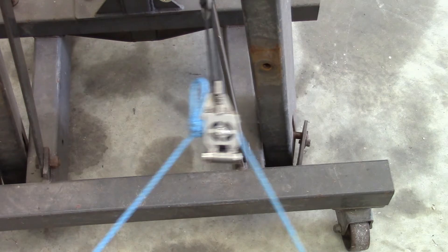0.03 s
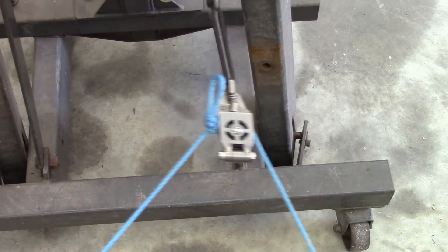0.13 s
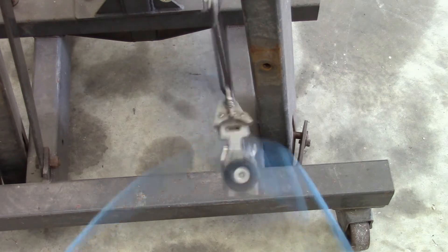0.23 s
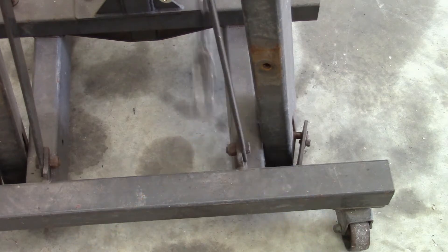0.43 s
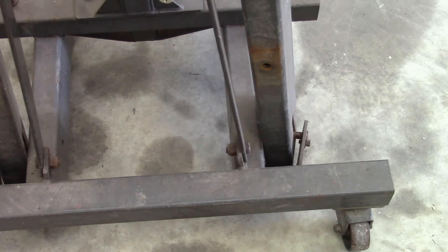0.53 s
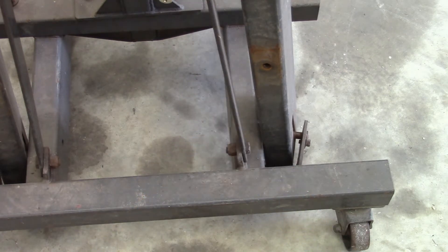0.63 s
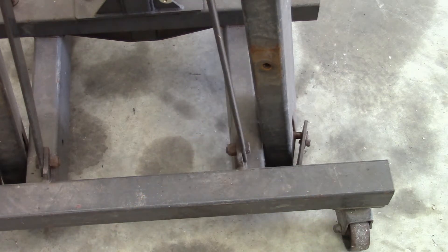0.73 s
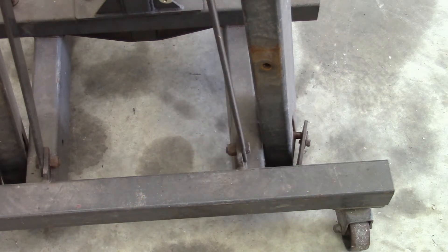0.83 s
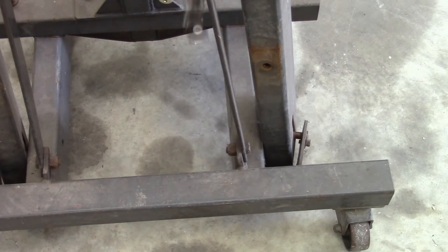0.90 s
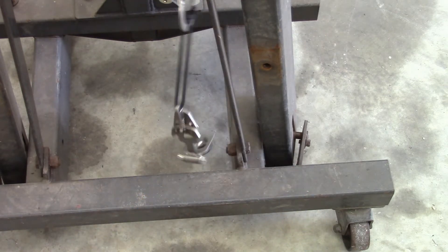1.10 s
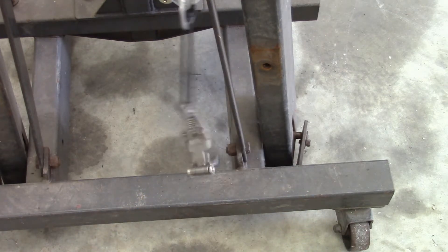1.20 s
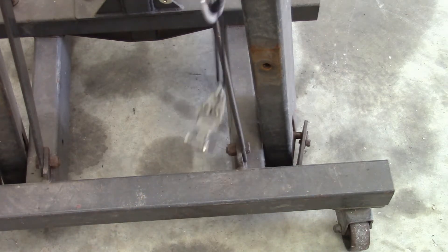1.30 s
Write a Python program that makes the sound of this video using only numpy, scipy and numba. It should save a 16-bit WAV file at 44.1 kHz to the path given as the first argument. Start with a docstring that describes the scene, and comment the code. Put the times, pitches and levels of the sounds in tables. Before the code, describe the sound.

A metal pulley lets go with a sharp click, then clanks and rattles against a steel frame, which rings briefly. The hits are close, echoing in a hard workshop over a machine's hum and low rumble.

```python
"""A metal pulley on a stretched cord is let go with a sharp click, flies up, clanks against a steel
frame and rattles back down. The cord hisses briefly as it slips; the pulley's loose parts crack and ring.
The frame rings with a few strong modes over many weak ones. A hard workshop room echoes the metal
over a machine's hum and low rumble. A limiter ducks under the loudest hits."""
import sys
import numpy as np
from scipy import signal
from scipy.fft import rfft, irfft
from scipy.io import wavfile
from scipy.ndimage import uniform_filter1d, minimum_filter1d
from numba import njit

SR = 44100
rng = np.random.default_rng(int(sys.argv[2]) if len(sys.argv) > 2 else 0)


def store_pcm(level_fs):
    """Save levels as 16-bit WAV."""
    pcm = np.round(np.clip(level_fs, -1, 1) * 32767).astype(np.int16)
    wavfile.write(sys.argv[1], SR, np.atleast_2d(pcm).T)


N = 59535

# machine hum partials: pitch_hz, rms_db
HUM_PARTIALS = [(125, -51.5), (188, -38.5), (310, -46.5), (436, -64.5), (815, -46.5)]
# rumble spectrum: freq_hz, density_db
RUMBLE_SPECTRUM = [(25, -41), (45, -25), (70, -16), (95, -12.5), (135, -2.5), (250, 1), (550, -3),
                   (850, -5.5), (1100, -12), (2400, -23), (5000, -34.5), (10000, -41.5), (15000, -58)]
# rumble, side against mid: freq_hz, gain_db
RUMBLE_SIDE_GAIN = [(25, -5), (60, -14), (125, -21.5), (300, -24.5), (1000, -19.5), (5000, -7.5)]
# noise of the slip and the clicks: freq_hz, density_db
CRACK_SPECTRUM = [(100, -76), (1000, -35), (3000, -10.5), (5000, -5), (7500, -1.5), (9500, 0), (11000, -2),
                  (13600, -3), (14400, -7), (16000, -8.5)]
# clicks of the pulley's parts: start_s, level_db, tilt_db_per_oct, rise_s
PULLEY_CLICKS = [(.2245, -17.5, -6, 0.00061), (.2303, -2, -2.5, 0.00051), (.2330, -0.5, 2.5, 0.00057),
                 (.302, -19, 4, .003), (.385, -32.5, -7, 0.0011), (.430, -11.5, -14, 0.0027),
                 (.485, -21, -7, 0.0032), (.5128, -10.5, -4, 0.00021), (.528, -10, 2, 0.0016),
                 (.720, -23.5, -14, 0.0021), (.8495, -26, -4, .001), (.893, -20, -4, 0.0035),
                 (.933, -9, 1, 0.0017), (.9805, 6, 5, .0004), (.9824, 5, 1, 0.00035),
                 (.9858, -6, 3, 0.00059), (1.10, -24, -4, 0.0035), (1.201, -18.5, -22, 0.0027)]
# pulley modes: pitch_hz, level_db, t60_s
PULLEY_MODES = [(1980, -19, .03), (4030, -10, .035), (6580, -6, .03), (7305, -5, .035), (7770, -4, .04),
                (7955, -1, .04), (8750, -7, .03), (10670, -4, .03), (10990, -3, .035), (11900, -6, .03),
                (13025, -4, .03), (13520, -1, .035)]
# blows on the frame: start_s, level_db, tilt_db_per_oct, rise_s, strong_db, spot_hz, spot_db
FRAME_BLOWS = [(0.257, -15.5, -10, 0.03, -7.5, 1798, 11.5), (.384, -31, -5, 0.001, -3, 2140, 12),
               (.426, -15, -1.5, 0.0046, 2, 1076, 13.5), (.513, -3.5, .5, 0.0015, -2, 3820, 8),
               (0.537, -12, 3.5, 0.0014, 2.5, 2460, 15.5), (.560, -16, -4.5, 0.0013, 0.5, 868, 15.5),
               (.719, -28, -1.5, 0.0018, -1, 4800, 14), (0.848, -10.5, -1, .003, 0, 3870, 7.5),
               (.925, -11, 3.5, 0.0027, -22, 2280, 16.5), (.931, -6.5, -0.5, 0.001, -6, 3170, 7.5),
               (1.095, -30.5, -4, .004, 5, 3020, -3), (1.165, -27.5, -0.5, 0.015, -2, 1056, -3.5),
               (1.195, -22, -9.5, 0.0098, -4.5, 1840, 7), (1.222, -34.5, -10.5, 0.0052, -1, 2430, 16.5),
               (1.339, -31.5, 2.5, 0.011, -11, 4410, 13)]
# strong frame modes: pitch_hz, level_db, t60_s
STRONG_MODES = [(872, -23, .45), (1056, -11, .42), (1312, -11, .48), (1655, -8, .45), (1798, -12, .42),
                (2088, -5, .3), (2149, -6, .45), (2317, -4, .42), (2360, -4, .55), (2628, -6, .35),
                (2800, -8, .35), (2896, -5, .35), (2968, -2, .38), (3520, -4, .25), (3700, -2, .3),
                (3809, -1, .22), (4005, -1, .2), (4119, -2, .2), (4689, -3, .22), (6215, -9, .28),
                (7360, -14, .3), (10800, -13, .2)]
# weak frame modes, level of each: freq_hz, level_db
WEAK_SPECTRUM = [(400, -19), (800, -20), (1250, -4.5), (1500, -5.5), (1700, -3), (2400, 1), (3000, 2),
                 (3900, 2.5), (5100, -1), (8000, -6.5), (8700, -12), (11000, -13), (15500, -32)]
# room decay (negative below about 600 Hz: those bands swell late): freq_hz, t60_s
ROOM_DECAY = [(300, -0.8), (1200, 0.77), (2500, 0.57), (5000, 0.29), (8000, .5), (15000, 0.23)]
# echo against direct sound: freq_hz, gain_db
ROOM_GAIN = [(300, 5.5), (1200, 2.5), (2500, -5.5), (5000, -13), (9000, -15.5), (15000, -22)]
# reflections in the side channel: freq_hz, gain_db
METAL_SIDE_GAIN = [(500, -26), (1200, -32), (2200, -23.5), (4000, -19), (12000, -16)]

TIME_S = np.arange(N) / SR
LN_1000 = np.log(1000)  # 60 dB of decay


def undb(db):
    return 10 ** (np.asarray(db) / 20)


def at_hz(table, hz):
    """Read a (freq_hz, value) table on a log-frequency axis."""
    freq_hz, values = np.array(table, float).T
    return np.interp(np.log(np.maximum(hz, 1)), np.log(freq_hz), values)


def colour(x, table):
    """Filter by a (freq_hz, gain_db) table."""
    return irfft(rfft(x) * undb(at_hz(table, np.fft.rfftfreq(N, 1 / SR))), N)


def noise(spectrum):
    """Coloured noise, rms 1."""
    y = colour(rng.standard_normal(N), spectrum)
    return y / y.std()


def wander(rate_hz):
    """Smooth random curve, standard deviation 1."""
    hold = int(SR / rate_hz)
    steps = np.repeat(rng.standard_normal(N // hold + 1), hold)
    y = uniform_filter1d(uniform_filter1d(steps, hold), hold)[:N]
    return y / y.std()


def add(out, start_s, y):
    i = int(start_s * SR)
    out[i:i + len(y)] += y[:N - i]


def stereo(mid, side):
    return np.array([mid + side, mid - side])


@njit
def sum_phasors(start, poles, samples):
    y, phasors = np.zeros(samples), start.copy()
    for i in range(samples):
        for k in range(len(phasors)):
            phasors[k] *= poles[k]
            y[i] += phasors[k].imag
    return y


def ring(hz, level_db, t60_s, samples):
    """Damped modes struck once, random phases."""
    poles = np.exp((2j * np.pi * hz - LN_1000 / t60_s) / SR)
    start = undb(level_db) * np.exp(2j * np.pi * rng.random(len(hz)))
    return sum_phasors(start, poles, samples)


def machine_hum(waver_db=4.5, drift_rad=0.33):
    """Steady pitches, each wavering in level and phase."""
    out = np.zeros(N)
    for hz, rms_db in HUM_PARTIALS:
        amplitude = np.sqrt(2) * undb(rms_db + waver_db * wander(rate_hz=21.2))
        out += amplitude * np.sin(2 * np.pi * hz * TIME_S + drift_rad * wander(rate_hz=14.17))
    return out


def workshop_rumble(rms_db=-34.5):
    """Low noise, nearly the same in both ears."""
    mid = noise(RUMBLE_SPECTRUM)
    side = colour(noise(RUMBLE_SPECTRUM), RUMBLE_SIDE_GAIN)
    return undb(rms_db) * stereo(mid, side)


def cord_slip(start_s=0.196, length_s=0.026, end_db=-45):
    """The cord slides out with a growing hiss before the release."""
    ramp = (TIME_S - start_s) / length_s
    return noise(CRACK_SPECTRUM) * undb(end_db) * ramp * ((ramp > 0) & (ramp < 1))


def pulley_clicks(crack_gain_db=-5, crack_t60_s=0.017, ring_gain_db=-15.5):
    """Loose parts knock together: a noise crack and a brief ring per click."""
    hz, mode_db, t60_s = np.array(PULLEY_MODES, float).T
    crack_envelope = undb(crack_gain_db) * np.exp(-LN_1000 * TIME_S / crack_t60_s)
    out = np.zeros(N)
    for start_s, level_db, tilt_db_per_oct, rise_s in PULLEY_CLICKS:
        def tilt_db(f):
            return tilt_db_per_oct * np.log2(np.maximum(f, 6000) / 9000)

        click = noise([(f, db + tilt_db(f)) for f, db in CRACK_SPECTRUM]) * crack_envelope
        add(click, 0, ring(hz, mode_db + ring_gain_db + tilt_db(hz), t60_s, samples=3000))
        attack = 1 - np.exp(-TIME_S / rise_s)
        add(out, start_s, click * undb(level_db) * attack)
    return out


def weak_modes(strong_hz, count=480, gain_db=-26.5, cluster_db=5, cluster_width_hz=45,
               typical_t60_s=0.21, t60_spread_oct=0.25):
    """The frame's dense weak modes, louder close to a strong one."""
    position = (np.arange(count) + rng.random(count)) / count
    hz = np.interp(position, [0, 1], np.sqrt([400, 15500])) ** 2
    t60_scatter = 2 ** (t60_spread_oct * rng.standard_normal(count))
    t60_s = typical_t60_s * (hz / 3000) ** 0.0099 * t60_scatter
    apart_hz = np.abs(hz[:, None] - strong_hz).min(1)
    lift_db = cluster_db * np.exp(-(apart_hz / cluster_width_hz) ** 2)
    return hz, at_hz(WEAK_SPECTRUM, hz) + gain_db + lift_db, t60_s


def frame_clanks(strong_gain_db=-13.5, scatter_db=1, spot_width_oct=0.063):
    """Each blow rings the same steel modes; the struck spot favours those near spot_hz."""
    hz, mode_db, t60_s = np.array(STRONG_MODES, float).T
    weak_hz, weak_db, weak_t60_s = weak_modes(hz)
    out = np.zeros(N)
    for start_s, level_db, tilt_db_per_oct, rise_s, strong_db, spot_hz, spot_db in FRAME_BLOWS:
        def strike_db(f, spot_share):
            tilt_db = tilt_db_per_oct * np.log2(f / 3000)
            lift_db = spot_share * spot_db * np.exp(-(np.log2(f / spot_hz) / spot_width_oct) ** 2)
            return level_db + tilt_db + lift_db + scatter_db * rng.standard_normal(len(f))

        struck_db = mode_db + strong_gain_db + strong_db + strike_db(hz, spot_share=1)
        clank = ring(hz, struck_db, t60_s, samples=24000)
        struck_weak_db = weak_db + strike_db(weak_hz, spot_share=0.5)
        add(clank, 0, ring(weak_hz, struck_weak_db, weak_t60_s, samples=11000))
        attack = 1 - np.exp(-TIME_S[:len(clank)] / rise_s)
        add(out, start_s, clank * attack)
    return out


def room_echo(x, onset_s=0.011):
    """Diffuse workshop echo; the treble dies before the mids."""
    hz, time_s, bands = signal.stft(rng.standard_normal(N), SR, nperseg=256)
    onset = 1 - np.exp(-(time_s / onset_s) ** 2)
    envelope = onset * np.exp(-LN_1000 * time_s / at_hz(ROOM_DECAY, hz)[:, None])
    gain = undb(at_hz(ROOM_GAIN, hz)) / np.sqrt(N * np.mean(envelope ** 2, axis=1))
    _, impulse_response = signal.istft(bands * envelope * gain[:, None], SR)
    return signal.fftconvolve(x, impulse_response)[:N]


def limiter(x, limit_db=-0.4, lookahead_s=0.0058, release_s=0.011):
    """Gain drops just ahead of each peak over the limit and recovers quickly."""
    window = int(lookahead_s * SR)
    excess_nepers = np.maximum(np.log(np.abs(x).max(0) / undb(limit_db) + 1e-9), 0)
    held_nepers = -minimum_filter1d(-excess_nepers, window)
    decay = TIME_S / release_s
    # peak hold with exponential release
    cut_nepers = np.exp(np.maximum.accumulate(np.log(held_nepers + 1e-9) + decay) - decay)
    return x * np.exp(-uniform_filter1d(cut_nepers, window))


def scene(floor_delay_s=0.0017):
    """Metal close in front; floor reflection and room echo differ between the ears."""
    background = machine_hum() + workshop_rumble()
    metal = frame_clanks() + cord_slip() + pulley_clicks()
    floor_reflection = np.zeros(N)
    add(floor_reflection, floor_delay_s, metal)
    mid = metal + room_echo(metal)
    side = colour(floor_reflection + room_echo(metal), METAL_SIDE_GAIN)
    return background + stereo(mid, side)


def record(dry, cutoff_hz=15700):
    """Peak limiter, then a steep low-pass."""
    lowpass = signal.ellip(8, 0.2, 70, cutoff_hz, fs=SR, output="sos")
    return signal.sosfilt(lowpass, limiter(dry))


dry = scene()
out = record(dry)
store_pcm(out)
```